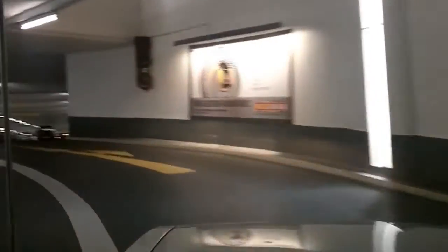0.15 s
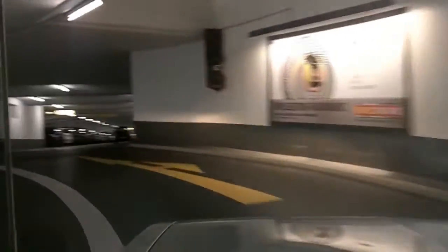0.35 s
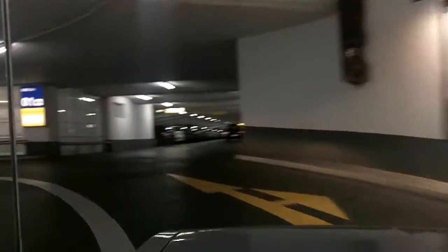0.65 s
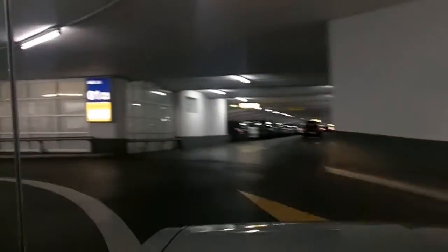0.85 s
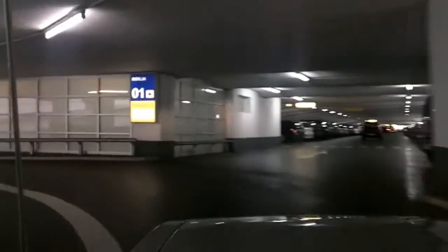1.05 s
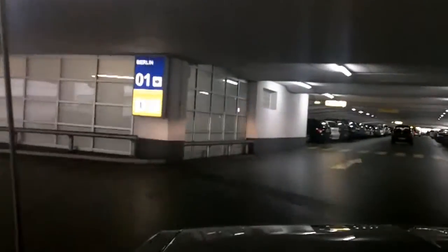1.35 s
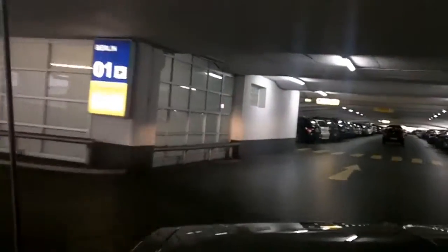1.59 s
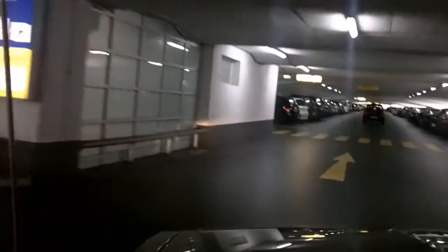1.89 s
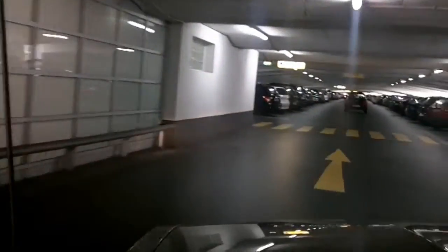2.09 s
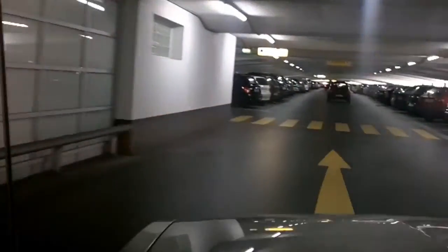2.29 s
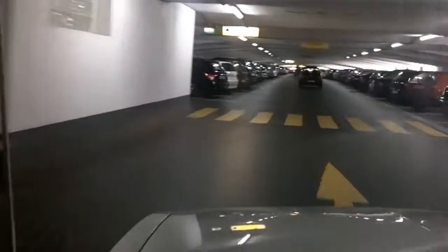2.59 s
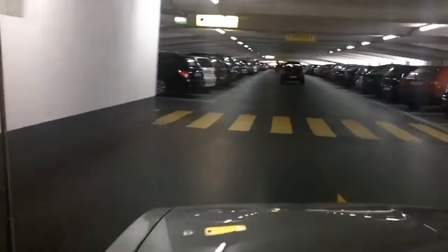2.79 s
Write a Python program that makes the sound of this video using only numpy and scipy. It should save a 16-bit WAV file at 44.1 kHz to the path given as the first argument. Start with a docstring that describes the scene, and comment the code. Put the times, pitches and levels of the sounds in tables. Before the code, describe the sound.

Car tyres squeal through a bend in a concrete parking garage, over engine hum and wind buffeting

```python
"""In a concrete parking garage a car rounds a bend, heard from a microphone outside on its body.
The tyres squeal on the smooth floor, unsteady stick-slip tones with rasp, until the wheels straighten.
The engine, a stack of low harmonics, sags and then pulls as the car gathers speed and tyre roar rises.
Rolling rumble, a body boom and thuds lie beneath. Gusts of shaped noise swell and break off,
and hard buffets thump the microphone."""
import sys
import numpy as np
from scipy import signal
from scipy.fft import rfft, irfft
from scipy.io import wavfile

SR = 44100
rng = np.random.default_rng(int(sys.argv[2]) if len(sys.argv) > 2 else 0)


def output_pcm(signal):
    """Save a mono or channel-first signal as 16-bit PCM at the path in sys.argv[1].

    Samples are clipped to [-1, 1] before scaling.
    """
    pcm = np.clip(np.atleast_2d(signal).T, -1, 1) * 32767
    wavfile.write(sys.argv[1], SR, np.round(pcm).astype(np.int16))


N = 129654
T = np.arange(N) / SR  # s

# hard buffets of air and the level change after each, where a negative dip is a rise:
# t/s, thump/dB, tick/dB, dip/dB
BUFFETS = [(0.349, -11.5, -54, 2.5), (.868, -14.5, -47.5, 4.5), (1.105, -21.5, -67, 3.5),
           (1.327, -7.5, -46.5, 9), (1.621, -14.5, -53.5, 1.5), (1.81, -5.5, -51, -1.5),
           (1.979, -8.5, -54, 7.5), (2.374, -12.5, -53, 10), (2.477, -12, -52, 3.5)]


def amp(db):
    """Decibels to gain."""
    return 10 ** (np.asarray(db) / 20)


def unit(x):
    """Scales to rms 1."""
    return x / np.sqrt(np.mean(x ** 2) + 1e-20)


def curve(rows, axis=1):
    """One column of a time table, at every sample."""
    rows = np.array(rows)
    return np.interp(T, rows[:, 0], rows[:, axis])


def by_hz(rows, hz):
    """Reads a spectrum on a log-frequency axis."""
    f, value = np.transpose(rows)
    return np.interp(np.log(hz + 1), np.log(f), value)


def noise(colour):
    """White noise filtered to the given spectrum, at rms 1."""
    gain = amp(by_hz(colour, np.fft.rfftfreq(N, 1 / SR)))
    return unit(irfft(rfft(rng.standard_normal(N)) * gain, N))


def wander(rate_hz):
    """Smooth random drift of rms 1, whose spectrum falls away above the rate."""
    hz = np.fft.rfftfreq(N, 1 / SR)
    lowpass = (hz > 0) / (1 + (hz / rate_hz) ** 2)
    return unit(irfft(rfft(rng.standard_normal(N)) * lowpass, N))


def turns(hz):
    """Phase in radians of a frequency curve, from a random start."""
    return 2 * np.pi * (np.cumsum(hz * np.ones(N)) / SR + rng.random())


def fuzzy(hz, width_hz):
    """A resonance driven by noise: two slow drifts on a carrier in quadrature."""
    phase = turns(hz)
    return unit(wander(width_hz) * np.cos(phase) + wander(width_hz) * np.sin(phase))


def bell(at_s, width_s):
    """A smooth pulse of height 1, down to 1/e at the width on either side."""
    return np.exp(-((T - at_s) / width_s) ** 2)


def tread(hz, overtone_db, count):
    """Ribs of the tread stick and slip, each at a slightly different, unsteady rate; the middle is loudest."""
    rib_spread, jitter, jitter_hz = .05, .015, 131.3  # spread and jitter as fractions of the pitch
    outer_rib_db, grip_db, grip_hz = -6.5, 6, 59.5
    out = np.zeros(N)
    for offset in np.linspace(-1, 1, count):
        phase = turns(hz * (1 + rib_spread * offset + jitter * wander(jitter_hz)))
        grip = amp(outer_rib_db * abs(offset) + grip_db * wander(grip_hz))
        partials = sum(amp(db) * np.sin((k + 1) * phase) for k, db in enumerate(overtone_db))
        out += grip * partials
    return unit(out)


def main_squeal():
    """Stick-slip tone of the scrubbing tread, with noise bands of sliding rubber that follow its pitch."""
    # stick-slip rate of the tread: t/s, f/Hz
    squeal_pitch = [(0, 1654), (.11, 1629), (.2, 1584), (.3, 1589), (.55, 1620), (.7, 1603), (.82, 1611),
                    (.97, 1664), (1.06, 1660), (1.15, 1611), (1.45, 1587), (1.9, 1570)]
    # how hard the tyres scrub: t/s, level/dB
    scrub = [(0, -34.5), (.08, -37), (.135, -27), (.2, -37), (.28, -24), (.37, -32.5), (.47, -34.5),
             (.54, -28.5), (.69, -29.5), (.735, -33), (.79, -26), (.82, -43), (.86, -27), (.92, -30.5),
             (.96, -26), (1.09, -32.5), (1.12, -31), (1.16, -32), (1.31, -36), (1.37, -52), (1.47, -38),
             (1.62, -56.5), (1.7, -52), (1.8, -52.5), (2.05, -57.5), (2.3, -74)]
    # fundamental, then overtones in order: level/dB
    overtone_db = [6, -13.5, -25, -39]
    # rasp at and near the harmonics: multiple of the pitch, width/Hz, level/dB
    rasp_bands = [(1, 300, -15.5), (1.93, 189, -17), (2.95, 295, -29.5)]
    hz = curve(squeal_pitch)
    tone = tread(hz, overtone_db, count=5)
    rasp = sum(amp(db) * fuzzy(multiple * hz, width_hz) for multiple, width_hz, db in rasp_bands)
    return amp(curve(scrub)) * (tone + rasp)


def chirp():
    """The thinner stick-slip tone of a second tyre."""
    # t/s, f/Hz, level/dB
    chirp_path = [(0, 1712, -49), (.12, 1653, -42.5), (.21, 1610, -49.5), (.3, 1590, -36.5),
                  (.45, 1606, -49.5), (.6, 1620, -48.5), (.79, 1610, -48), (.83, 1680, -46),
                  (.87, 1740, -47), (.92, 1738, -48), (1.0, 1813, -39.5), (1.05, 1790, -46.5),
                  (1.095, 1770, -36.5), (1.13, 1740, -53), (1.3, 1698, -45), (1.38, 1706, -76)]
    # fundamental, then overtones in order: level/dB
    chirp_overtone_db = [-5.5, -2, -28]
    tone = tread(curve(chirp_path), chirp_overtone_db, count=3)
    return amp(curve(chirp_path, axis=2)) * tone


def tyres():
    """Both tyres scrub the floor at once."""
    return main_squeal() + chirp()


def garage(x):
    """Dense echoes from bare concrete as decaying noise, the treble dying first."""
    # reverberation time: f/Hz, t60/s
    decay_time = [(100, 1.2), (1600, 0.61), (6000, 0.44)]
    hz, t, z = signal.stft(rng.standard_normal(SR), SR, nperseg=256)
    decay = amp(-60 * t / by_hz(decay_time, hz)[:, None])
    tail = signal.istft(z * decay, SR, nperseg=256)[1]
    return signal.fftconvolve(x, tail / np.linalg.norm(tail))[:N]


def engine():
    """Low hum on the multiples of the firing rate, each drifting in level."""
    # firing rate and loudness: t/s, f/Hz, level/dB
    firing = [(0, 84.5, -36), (.3, 83.7, -37), (.6, 80, -39), (.95, 59.63, -51.5), (1.25, 59.7, -34.5),
              (1.45, 69.9, -28.5), (1.9, 74.56, -31.5), (2.4, 76, -30.5), (2.78, 77.3, -27.5),
              (2.94, 73.3, -36.5)]
    # multiples of the firing rate in order: level/dB
    engine_order_db = [0, -10, -20, -24.5]
    phase = turns(curve(firing) * (1 + 0.0083 * wander(17)))
    hum = sum(amp(db + 3.2 * wander(3.1)) * np.sin((k + 1) * phase) for k, db in enumerate(engine_order_db))
    return amp(curve(firing, axis=2)) * unit(hum)


def roar():
    """The rolling tread excites resonances of tyre and wheel arch, louder as the car gathers speed."""
    # t/s, level/dB
    roar_level = [(0, -63.5), (1.7, -63), (2.1, -50.5), (2.35, -41.5), (2.55, -46), (2.75, -44.5),
                  (2.86, -34.5), (2.94, -41.5)]
    # resonances: f/Hz, width/Hz, level/dB
    resonances = [(299.3, 19, 3), (383, 11, -3), (496, 22, -5), (768, 23, -2.5), (878, 29, -0.5),
                  (1035, 65, -11), (1227, 28, -9)]
    ring = sum(amp(db) * fuzzy(hz, width_hz) for hz, width_hz, db in resonances)
    return amp(curve(roar_level)) * unit(ring)


def rolling():
    """Deep noise rumble and the body's boom, a low tone wavering in pitch and level."""
    # boom of the car's body: t/s, level/dB
    boom_level = [(0, -24), (.6, -33.5), (1.0, -39), (1.3, -27), (1.7, -28), (2.3, -29), (2.94, -28)]
    # rumble: t/s, level/dB
    rumble_level = [(0, -28.5), (.9, -26), (1.3, -24), (2.3, -23.5), (2.94, -26.5)]
    # colour of the rumble: f/Hz, level/dB
    rumble_colour = [(5, -11), (15, -4), (27, 1.5), (55, -9), (100, -17), (160, -21.5), (300, -34),
                     (700, -58), (2000, -74)]
    boom_hz, waver_hz = 43.13, 8.3  # pitch, and rate of the wavering
    boom_swell = amp(0.96 * wander(waver_hz))
    boom = unit(boom_swell * np.sin(turns(boom_hz + 3.86 * wander(waver_hz))))
    return amp(curve(rumble_level)) * noise(rumble_colour) + amp(curve(boom_level)) * boom


def bumps():
    """The body thuds over uneven floor in short, dull swells of noise."""
    # t/s, half length/s, level/dB
    thuds = [(0.334, 0.045, -38), (0.558, 0.037, -37.5), (1.253, 0.062, -32), (1.475, .04, -37),
             (2.324, 0.041, -29.5), (2.874, 0.049, -33)]
    # colour of the thuds: f/Hz, level/dB
    thud_colour = [(40, -27), (110, 0), (190, -1.5), (300, -20), (1500, -64)]
    return noise(thud_colour) * sum(amp(db) * bell(s, width_s) for s, width_s, db in thuds)


def buffets():
    """A swing of pressure on the microphone with a noisy tick at its crest."""
    # colour of the tick: f/Hz, level/dB
    tick_colour = [(500, -4.5), (3000, 2.5), (6000, 3.5), (15000, -5.5)]
    thump_s, tick_s = 0.006, .004
    tick = noise(tick_colour)
    out = np.zeros(N)
    for s, thump_db, tick_db, _ in BUFFETS:
        swing = bell(s, thump_s) - .5 * bell(s, 2 * thump_s)  # crest between two shallow troughs
        out += amp(thump_db) * swing + amp(tick_db) * bell(s, tick_s) * tick
    return out


def dips_db():
    """Level change after each buffet: a quick ramp, then an exponential return."""
    fall_s, recover_s = 0.0087, 0.037
    out = np.zeros(N)
    for s, _, _, db in BUFFETS:
        fall = np.clip((T - s) / fall_s, 0, 1)
        recovery = np.exp(-np.maximum(T - s - fall_s, 0) / recover_s)
        out -= db * fall * recovery
    return out


def air():
    """Rush and hiss swell together in each gust and flutter with the turbulence."""
    # steady rush of air and rolling tyres: t/s, level/dB
    rush_level = [(0, -44.5), (.3, -43.5), (.7, -46.5), (1.25, -42.5), (1.38, -46), (1.55, -42),
                  (1.72, -49), (2.1, -42), (2.32, -43), (2.41, -40.5), (2.6, -42), (2.83, -34), (2.94, -33)]
    # colour of the rush: f/Hz, level/dB
    rush_colour = [(20, -9), (120, 1.5), (200, 2), (320, -2.5), (500, -3.5), (850, -7), (1250, -10.5),
                   (2200, -13), (3500, -23.5), (5000, -22.5), (7000, -36.5), (15000, -44.5)]
    # fine hiss of the air: t/s, level/dB
    hiss_level = [(0, -56), (.3, -54), (.8, -56.5), (1.05, -49), (1.3, -57), (1.38, -60.5), (1.52, -56),
                  (1.72, -64.5), (1.85, -61.5), (2.4, -58), (2.7, -55.5), (2.94, -49.5)]
    # colour of the hiss: f/Hz, level/dB
    hiss_colour = [(20, -26), (900, -4), (2000, -13.5), (3500, 16), (4900, 3.5), (6400, -2.5),
                   (9000, -19.5), (15000, -11.5)]
    # gusts swell and then break off: peak t/s, rise/s, strength/dB
    gusts = [(0.148, 0.05, 3), (.275, 0.028, 7), (0.346, 0.047, 6.5), (0.554, 0.025, 6), (.79, 0.026, 3.5),
             (0.869, 0.011, 4.5), (0.986, 0.073, 2.5), (1.1, 0.032, 8.5), (1.195, 0.041, 6.5),
             (1.319, 0.057, 6.5), (1.486, 0.055, 7), (1.62, 0.034, 1), (1.809, 0.037, 7),
             (1.89, 0.028, 1.5), (1.973, 0.031, 7.5), (2.07, .03, 6), (2.272, 0.052, 2.5), (2.368, 0.12, 7),
             (2.476, 0.049, 7.5), (2.69, 0.018, 7.5), (2.859, 0.052, 2.5)]
    gust_fall_s, flutter_db, flutter_hz, hiss_gust_share = 0.012, 2.31, 65, 0.85
    gust_db = flutter_db * wander(flutter_hz)
    for peak_s, rise_s, db in gusts:
        gust_db = gust_db + db * bell(peak_s, np.where(T < peak_s, rise_s, gust_fall_s))
    rush = amp(curve(rush_level) + gust_db) * noise(rush_colour)
    hiss = amp(curve(hiss_level) + hiss_gust_share * gust_db) * noise(hiss_colour)
    return rush + hiss


def crackle():
    """Fine crackle of the air: tiny single-sample ticks of random time, sign and size."""
    # t/s, level/dB
    crackle_level = [(0, -74.5), (1.0, -69.5), (1.5, -65.5), (2.94, -67.5)]
    ticks_per_s, spread_db = 180, 5.5
    sizes = amp(spread_db * np.minimum(rng.exponential(1, N), 4)) * rng.choice([-1, 1], N)
    struck = rng.random(N) < ticks_per_s / SR
    return amp(curve(crackle_level)) * unit(sizes * struck)


def scene():
    """Tyres in the garage, over the car's own rumble and the moving air."""
    squeal, dip_db = tyres(), dips_db()
    echoing_squeal = squeal + amp(-5.5) * garage(squeal)
    bright = amp(-1.0) * echoing_squeal + air() + roar() + crackle()
    deep = engine() + rolling() + bumps()
    bass_dip_share = 0.33  # the lows dip less than the rest
    return (amp(dip_db) * bright + amp(bass_dip_share * dip_db) * deep + buffets())[None]


def record(dry):
    """Uneven, dull treble with steps down near 5 and 7.5 kHz, narrow notches, then the band limit."""
    # tone colour of the treble: f/Hz, level/dB
    top_colour = [(2400, 0), (2650, -0.5), (2830, 4.5), (3080, 0.5), (4950, -0.5), (5050, -8), (7000, -4.5),
                  (7700, -18.5), (8600, -10), (15000, -7.5)]
    # narrow notches: f/Hz, width/Hz
    notches = [(2715, 790), (5500, 580), (7850, 770), (10900, 640)]
    edge_hz = 15250
    top_gain = amp(by_hz(top_colour, np.fft.rfftfreq(2 * N, 1 / SR)))
    out = irfft(rfft(dry, 2 * N) * top_gain)[:, :N]
    for hz, width_hz in notches:
        out = signal.lfilter(*signal.iirnotch(hz, hz / width_hz, SR), out)
    lowpass = signal.firwin(511, edge_hz, window=("kaiser", 9), fs=SR)
    return signal.oaconvolve(out, lowpass[None], "same")


dry = scene()
out = record(dry)
output_pcm(out)
```